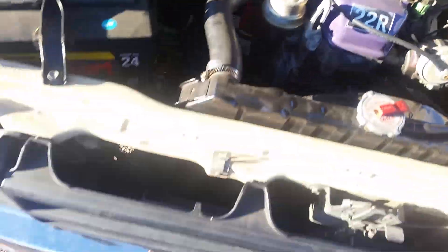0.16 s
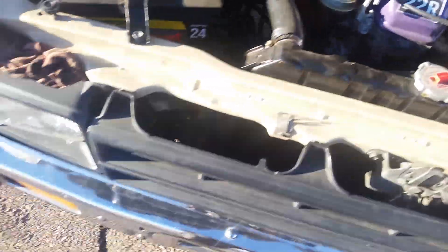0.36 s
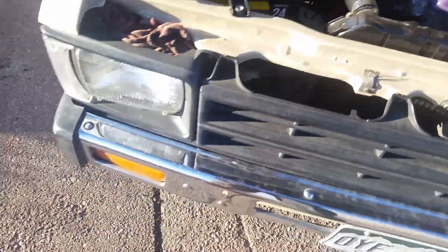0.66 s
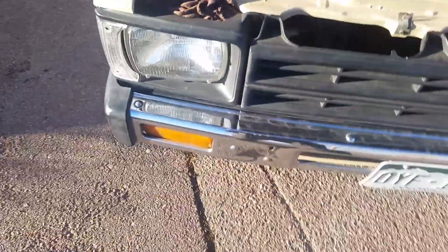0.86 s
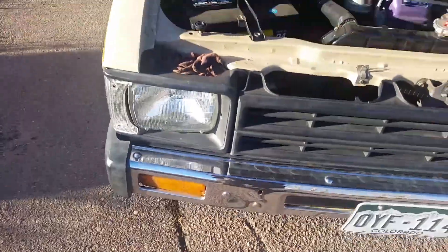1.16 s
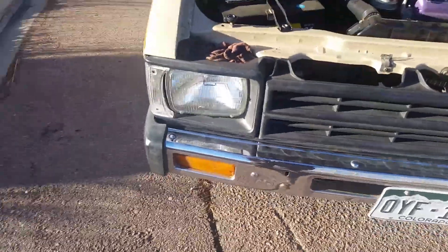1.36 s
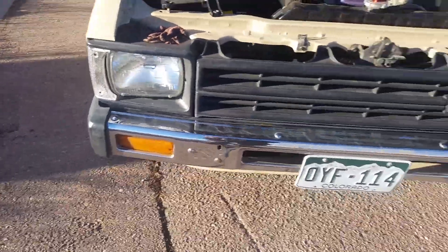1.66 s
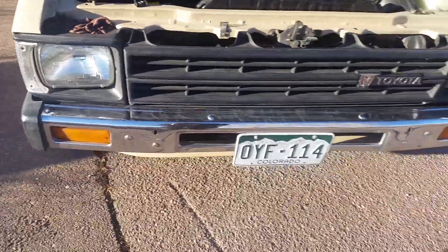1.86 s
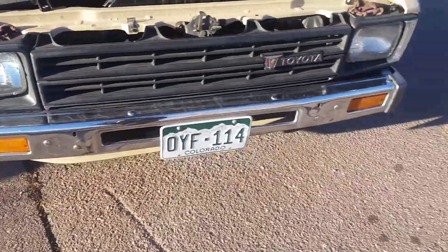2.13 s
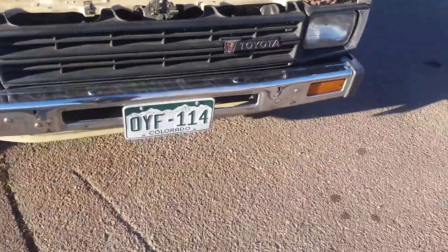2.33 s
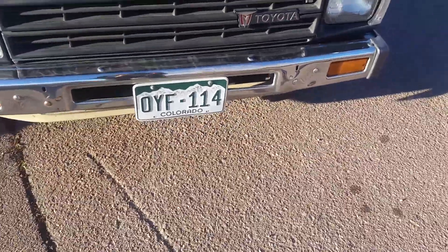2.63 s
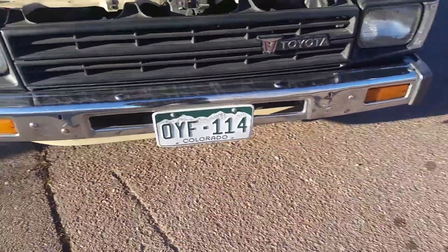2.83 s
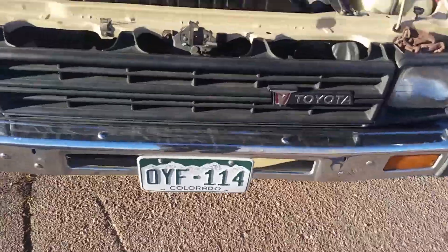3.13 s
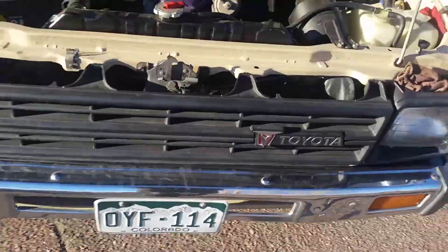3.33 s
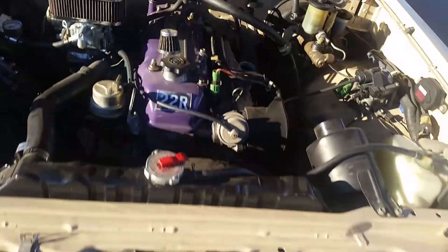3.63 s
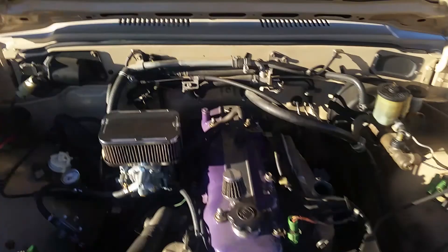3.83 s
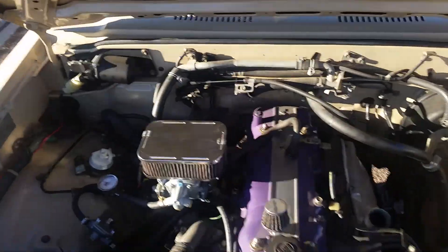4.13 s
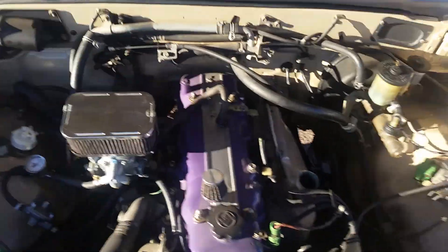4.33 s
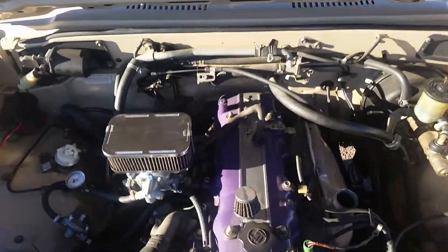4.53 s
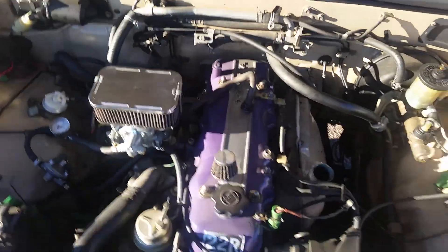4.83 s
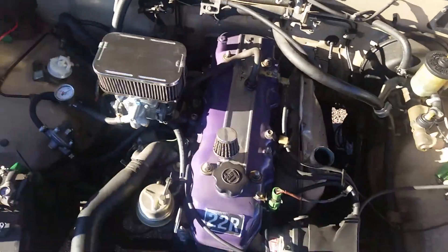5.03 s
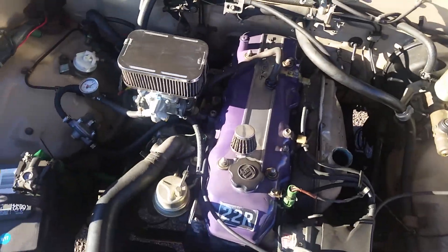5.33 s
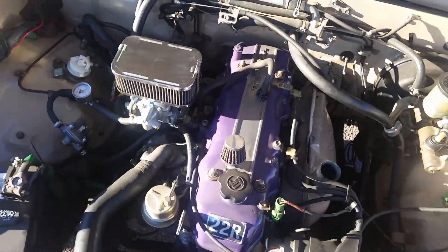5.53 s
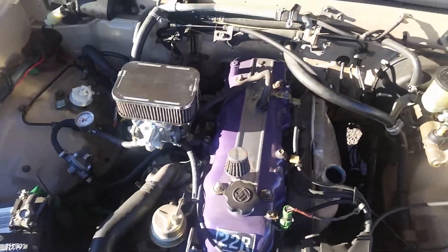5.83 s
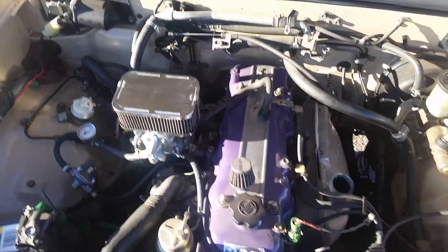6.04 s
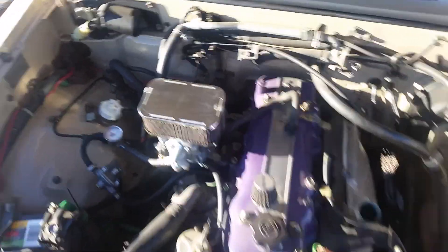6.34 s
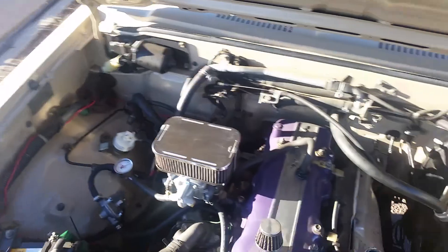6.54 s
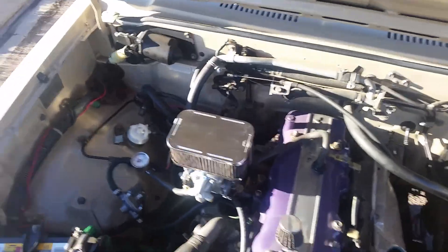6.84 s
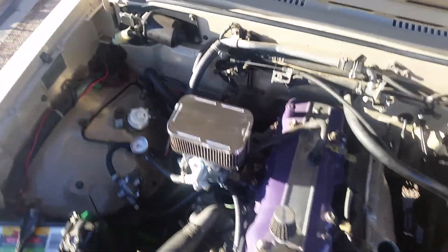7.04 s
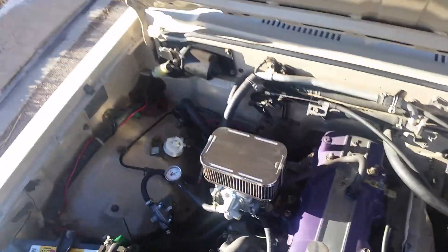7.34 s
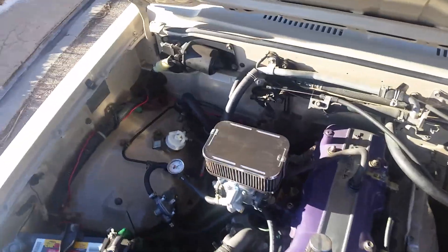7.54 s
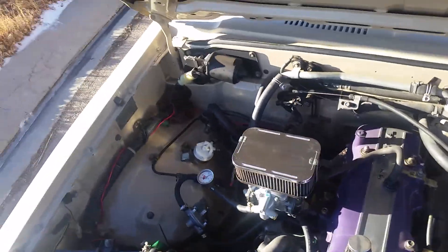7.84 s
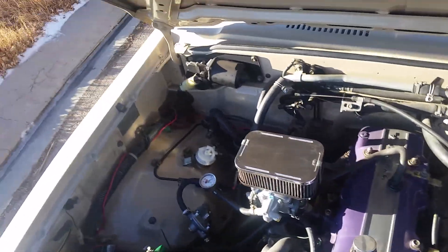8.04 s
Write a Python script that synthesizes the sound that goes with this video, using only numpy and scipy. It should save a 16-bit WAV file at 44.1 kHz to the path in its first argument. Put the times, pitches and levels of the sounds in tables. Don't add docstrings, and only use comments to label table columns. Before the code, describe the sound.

Steady low puttering idle with metallic clatter and airy hiss; one hard handling knock briefly dips the sound, then ticking stands out clearer.

```python
import sys
import numpy as np
from scipy import signal
from scipy.io import wavfile

SR = 44100
rng = np.random.default_rng(int(sys.argv[2]) if len(sys.argv) > 2 else 0)


def gain_from_db(level_db):
    decades = np.asarray(level_db, float) / 20
    return 10 ** decades


def wrap_up_sound(samples):
    columns = np.atleast_2d(samples).T
    tamed = np.clip(columns, -1, 1)
    steps = np.round(tamed * 32767).astype(np.int16)
    wavfile.write(sys.argv[1], SR, steps)


N = 361173

# frequency in Hz, t60 in seconds, level in dB.
CASTING_MODES = [(621, 0.049, 0.5), (765.6, 0.059, -1.5), (1635, 0.0054, -9.5), (1993, 0.011, -8),
                 (3110, 0.013, -25.5), (4145, 0.025, -25), (6380, 0.022, -13), (7090, 0.11, -15)]
# time in seconds, nearness in dB, view into the bay in dB,
# cover of the left port in dB.
MIC_WALK = [(0.0, -2, -7, -1), (0.13, -8.5, -1, 8), (0.27, -7.5, -0.5, 2), (0.43, -3.5, 1.5, 1.5),
            (0.55, -2.5, 3.5, 3), (0.8, -6, -3.5, 2.5), (1.05, -2.5, 0, 3.5), (1.25, -3.5, -1.5, 5.5),
            (1.6, -3, -2.5, 0.5), (1.75, -2.5, -2, -0.5), (1.92, -3.5, -1, 13), (2.3, -4.5, -4, 23),
            (2.62, -4, -4.5, 33), (2.76, -4, -2, 4), (2.93, -2.5, -1, 1.5), (4.6, -1, 0, 4),
            (6.6, 0, 1.5, 2.5), (8.19, -1, 2, 2)]


def in_time(rows):
    s, *columns = np.transpose(rows)
    return [np.interp(np.arange(N) / SR, s, column) for column in columns]


def at_hz(points, hz):
    table_hz, value = np.array(points).T
    return np.interp(np.log(hz), np.log(table_hz), value)


def rms_one(x):
    return x / np.sqrt(np.mean(x ** 2) + 1e-20)


def pan(db):
    return gain_from_db(np.multiply.outer([.5, -.5], db))


def drift(rate_hz):
    r = np.exp(-80 * np.pi * rate_hz / SR)
    white = rng.standard_normal(N // 40 + 2002)
    slow = signal.lfilter([1], [1, -2 * r, r * r], white)[2000:]
    return np.interp(np.arange(N) / 40, np.arange(len(slow)), rms_one(slow))


def ring(x, hz, t60_s):
    r = gain_from_db(-60 / (t60_s * SR))
    w = 2 * np.pi * hz / SR
    return signal.lfilter([0, np.sin(w)], [1, -2 * r * np.cos(w), r * r], x + 1e-18)


def band(x, low_hz, high_hz, order=2):
    return signal.sosfilt(signal.butter(order, [low_hz, high_hz], "band", fs=SR, output="sos"), x)


def bands(spectrum, edges_hz, patchy_db, rate_hz):
    # frequency in Hz, likeness as a share.
    likeness = [(60, 0.6), (130, 0.22), (290, 0.26), (640, 1), (1410, 0.08), (3100, 0.0054), (6820, 0.01),
                (15000, 0.01)]
    white = rng.standard_normal((2, 2, N))
    for k, (low_hz, high_hz) in enumerate(zip(edges_hz, edges_hz[1:])):
        mid, side = band(white[k % 2], low_hz, high_hz)
        hz = np.sqrt(low_hz * high_hz)
        alike = np.clip(at_hz(likeness, hz), 0, 1)
        gain = gain_from_db(at_hz(spectrum, hz) + patchy_db * drift(rate_hz))
        yield hz, gain * (np.sqrt(1 + alike) * mid + np.sqrt(1 - alike) * side * [[1], [-1]])


def over_bay():
    rise_s = (3.2, 4.2)
    return np.interp(np.arange(N) / SR, rise_s, [0, 1])


def duck(lead_s=0.0, slower=0.64):
    at_s, attack_s, hold_to_s, release_s = 3.01, 0.24, 3.825, 0.61
    t = np.arange(N) / SR
    fall = 1 - np.exp(-np.clip(t - at_s, 0, None) / (attack_s * slower))
    recovery = np.clip(1 - (t + lead_s - hold_to_s) / (release_s + lead_s), 0, 1)
    return fall * recovery


def heard_db(law, lead_s=0.0, slower=0.62):
    db, near_share, view_share, grille_db, duck_db = law
    near_db, view_db, _ = in_time(MIC_WALK)
    place_db = near_share * near_db + view_share * view_db + grille_db * (1 - over_bay())
    return db + place_db - duck_db * duck(lead_s, slower)


def exhaust(firings, boom_db, bark_db, rattle_db):
    cylinder_db = [-0.49, -0.3, -0.15, 0.47]
    # frequency in Hz, t60 in seconds, level in dB.
    pipe_modes = [(68.9, 0.2, -3), (85, 0.3, -15), (143.6, 0.19, -11)]
    # low edge in Hz, high edge in Hz, extra path in seconds.
    silencer = (152, 198, .0048)
    low_hz, high_hz, path_s = silencer

    count = np.floor(firings - .297).astype(int)
    uneven_db = 0.1 * rng.standard_normal(count.max() + 2)[count]
    strength_db = np.array(cylinder_db)[count % 4] + uneven_db
    pulses = np.diff(count, prepend=count[0]) * gain_from_db(strength_db)
    pipe = sum(gain_from_db(db) * ring(pulses, hz, t60_s) for hz, t60_s, db in pipe_modes)
    boom = gain_from_db(boom_db) * rms_one(band(pipe, 49.4, 129.7)) * pan(-1.35)[:, None]

    late = np.roll(pulses, round(path_s * SR))
    bark = gain_from_db(bark_db - 1.5) * rms_one(band(late, low_hz, high_hz, order=3))
    block_db = rattle_db - 3.5 - 15.0 * (1 - over_bay())
    knock = gain_from_db(block_db) * rms_one(band(late, 248, 328))
    rumble = gain_from_db(boom_db - 14.0) * rms_one(band(rng.standard_normal(N), 26, 181))
    return boom + bark + knock + rumble


def valve_gear(firings, rattle_db, sizzle_db):
    # frequency in Hz, density in dB per Hz.
    rattle_spectrum = [(120, -30), (200, -15), (234, -13), (341, -15.5), (489, -21), (902, -17.5),
                       (1070, -21), (1800, -26), (2010, -19.5), (2310, -27), (4200, -29.5), (4680, -33.5),
                       (5310, -27), (6020, -32.5), (8500, -31), (11000, -62), (18700, -120)]
    # frequency in Hz, left-right difference in dB.
    lean_by_hz = [(60, -1.0), (110, 0.0), (200, 10), (380, -0.5), (700, 4.5), (1290, 9), (2380, 4.5),
                  (4400, -2.0), (8120, 7.5), (15000, -5.0)]

    noise = 0
    for hz, x in bands(rattle_spectrum, np.geomspace(200, 8500, 17), patchy_db=2.5, rate_hz=29.6):
        treble = np.clip(np.log2(hz / 1800), 0, 1)
        level_db = (1 - treble) * rattle_db + treble * (sizzle_db + 9.5)
        noise = noise + gain_from_db(level_db + 27.5) * x * pan(at_hz(lean_by_hz, hz))[:, None]

    ticks_per_s = 300 * gain_from_db(5.0 * np.cos(2 * np.pi * (firings - .15)))
    sizes = gain_from_db(4.85 * np.minimum(rng.exponential(1, (2, N)), 4)) * rng.choice([-1, 1], (2, N))
    ticks = (rng.random((2, N)) < ticks_per_s / SR) * sizes
    ticks = ticks + 0.37 * ticks[::-1]
    rung = 0
    for hz, t60_s, db in CASTING_MODES:
        level_db = rattle_db if hz < 2500 else sizzle_db + 11.0
        rung = rung + gain_from_db(db + level_db) * rms_one(ring(ticks, hz, t60_s))
    return noise + gain_from_db(-7.5) * rung


def intake(firings):
    # frequency in Hz, density in dB per Hz.
    hiss_spectrum = [(4410, -40), (7500, -10), (7690, -5), (9000, 12), (9770, 7.5), (10900, 14.5),
                     (12600, -1), (13700, -2), (15100, 10), (15900, -9)]
    puff_db = [12.0, 4.0, -2.0, 3.0]
    puff_hz = [10900, 9000, 10500, 10500]
    # level in dB, share of nearness, share of view,
    # change at the grille in dB, duck depth in dB.
    low_law = (-44, 0.0, 0.8, -3, 24.5)
    high_law = (-36, 0.0, 1.0, -1.5, 27)

    lead_s = 0.12
    cover_db = in_time(MIC_WALK)[2]
    low_db = heard_db(low_law, lead_s) - 0.3 * cover_db
    high_db = heard_db(high_law, lead_s) - 0.17 * cover_db
    low_pan_db = 12 - cover_db
    high_pan_db = -7 - 0.73 * cover_db

    count, share = np.divmod(firings - .24, 1)
    count = count.astype(int)
    size_luck, pitch_luck = rng.standard_normal((count.max() + 2, 2))[count].T
    size = gain_from_db(np.array(puff_db)[count % 4] + 2.5 * size_luck - 3 * (1 - over_bay()))
    puff = size * np.sin(np.pi * np.clip(share / .7, 0, 1)) ** 2
    throat_hz = np.array(puff_hz)[count % 4] * (1 + .04 * pitch_luck) * (1.06 - .17 * share)

    low, high = 0, 0
    for hz, x in bands(hiss_spectrum, np.geomspace(7500, 16000, 11), patchy_db=1.7, rate_hz=14):
        if hz < 12000:
            reach = np.exp(-np.log2(hz / throat_hz) ** 2 / .03)
            low = low + x * np.hypot(1, puff * reach)
        else:
            high = high + x
    low = gain_from_db(low_db + 4.5) * pan(low_pan_db) * rms_one(low)
    high = gain_from_db(high_db - 4.0) * pan(high_pan_db) * rms_one(high) * np.hypot(1, .2 * puff)
    flutter = gain_from_db(1.4 * drift(20) + 0.8 * np.array([drift(12), drift(12)]))
    return flutter * (low + high)


def whistle():
    # level in dB, share of nearness, share of view,
    # change at the grille in dB, duck depth in dB.
    whistle_law = (-50.5, 0.0, 0.6, -0.5, 19.5)
    air = ring(ring(rng.standard_normal((2, N)), 5340, 0.009), 5450, 0.009)
    level_db = heard_db(whistle_law) + 2.0 * drift(0.69) + 0.5 * drift(10)
    return gain_from_db(level_db) * rms_one(air) * pan(-3.0)[:, None]


def microphone_noise():
    return gain_from_db(-72) * rms_one(band(rng.standard_normal((2, N)), 2500, 8500))


def gusts_db(gusts, breeze_db):
    breeze_duck_db, fall_db = 14, 11.5
    t = np.arange(N) / SR
    humps = [db - fall_db * ((t - s) / half_s) ** 2 for s, db, half_s in gusts]
    return np.max(humps + [breeze_db - breeze_duck_db * duck()], axis=0)


def wind():
    # frequency in Hz, density in dB per Hz.
    wind_spectrum = [(24, -41), (45, -4), (115, 8), (241, -14.5), (271, -11), (326, -26.5), (556, -32.5),
                     (658, -34), (900, -39), (1170, -66), (1980, -120)]
    # peak in seconds, level in dB, half length in seconds.
    left_gusts = [(.17, -10.5, 0.12), (.25, -7.5, 0.12), (.33, -10.5, 0.062), (.66, -13, 0.09),
                  (.775, -8.5, 0.078), (.98, -21, 0.17), (1.12, -17, .07), (1.42, -18, 0.061),
                  (1.71, -20.5, 0.06), (2.65, -25, 0.067), (2.8, -25, 0.13), (3.85, -33.5, 0.072),
                  (4.25, -24, 0.26), (5.69, -21, 0.036), (5.86, -13, 0.041), (6.03, -19, 0.19),
                  (6.2, -17, 0.12), (6.37, -17, 0.038), (6.53, -19.5, 0.1), (6.92, -21.5, 0.24),
                  (7.12, -18, .09), (7.3, -18.5, 0.1), (7.76, -27, 0.13)]
    # peak in seconds, level in dB, half length in seconds.
    right_gusts = [(.54, -27, 0.3), (1.21, -21.5, 0.077), (2.06, -23.5, 0.057), (2.89, -31, .1),
                   (3.41, -37.5, .1), (4.34, -30, 0.029), (5.77, -30, .06), (6.45, -25.5, .07),
                   (6.62, -23.5, 0.076), (7.46, -32, 0.086), (8.14, -30, 0.14)]

    hump_db = np.array([gusts_db(left_gusts, breeze_db=-35), gusts_db(right_gusts, breeze_db=-44)])
    level_db = hump_db + 3.96 * np.array([drift(15.8), drift(23)])
    strong_db = np.clip(level_db + 12.0, -10, 20)
    gust = 0
    for hz, x in bands(wind_spectrum, np.geomspace(42, 900, 10), patchy_db=-2.0, rate_hz=14.0):
        gust = gust + x * gain_from_db(0.44 * strong_db * np.clip(np.log2(hz / 150), 0, 1.5))
    return gain_from_db(level_db + 15.0) * gust


def scuffs(rows, below, above, channels):
    out = np.zeros((channels, N))
    for s, length_s, hz, db in rows:
        swell = np.sin(np.pi * np.linspace(0, 1, round(length_s * SR)) ** 0.5) ** 2
        noise = rng.standard_normal((channels, SR // 3))[:, :len(swell)]
        start = round(s * SR)
        scuff = swell * gain_from_db(db) * rms_one(band(noise, hz / below, hz * above))
        out[:, start:start + len(swell)] += scuff
    return out


def handling():
    # time in seconds, # body
    # level in dB, body frequency in Hz, t60 in seconds, snap level in dB.
    knocks = [(.150, -16, 350, 0.01, -45), (.206, -10.5, 302, 0.014, -50), (.612, -21, 440, 0.015, -37),
              (0.256, -22, 507, 0.025, -55), (0.783, -16, 434, 0.025, -47), (1.4677, -5, 400, 0.0036, -20),
              (2.485, -33, 420, .016, -29.5), (2.7858, -11, 456, 0.01, -14.5), (3.0724, 2.5, 520, .012, -3),
              (3.0926, -8.5, 440, 0.0085, -31), (3.321, -40, 420, .02, -58), (3.436, -27, 487, 0.0059, -46),
              (3.552, -22, 390, 0.012, -57), (3.658, -28, 399, 0.012, -61), (6.533, -21, 627, 0.017, -30),
              (7.8163, -16.5, 361, 0.15, -34), (7.84, -20, 460, 0.027, -26)]
    # start in seconds, length in seconds, frequency in Hz, level in dB.
    palm_rubs = [(.84, 0.32, 1140, -43), (1.10, .033, 300, -34), (1.30, 0.03, 1390, -37),
                 (1.695, 0.042, 336, -24), (2.74, 0.15, 690, -39.5), (2.875, 0.066, 482.4, -28.5),
                 (2.92, 0.031, 533, -29), (3.003, 0.034, 940, -33.5), (3.38, .066, 460, -46),
                 (6.51, 0.079, 239, -20.5), (7.806, 0.039, 4900, -34), (7.812, 0.042, 486, -25)]
    # start in seconds, length in seconds, frequency in Hz,
    # level in dB.
    tip_scratches = [(.84, 0.3, 2680, -39), (.45, .25, 1490, -56), (1.30, 0.047, 1660, -34.5),
                     (1.34, 0.11, 1400, -38), (1.69, 0.058, 1630, -32), (2.74, 0.094, 2960, -38),
                     (2.92, .034, 980, -42), (3.003, 0.048, 4480, -35), (3.10, 0.19, 2780, -49.5),
                     (3.365, 0.051, 2400, -55), (3.395, 0.04, 2940, -46.5), (6.51, 0.1, 537, -21.5),
                     (7.806, 0.035, 12000, -23), (7.812, 0.04, 1300, -29)]
    grip_ends_db = (16, -1.5)

    out = np.zeros((2, N))
    impulse = signal.unit_impulse(2400)
    crack = band(impulse, 4000, 15000)
    click = band(impulse, 60, 4600, order=3)
    snap = ring(click, 1300, 0.0039) - 0.66 * ring(click, 2400, 0.0065)
    snap = snap + 0.88 * ring(click, 3640, 0.003) + 0.68 * ring(click, 7300, 0.001) + 0.16 * crack
    grip_db = np.interp(over_bay(), [0, 1], grip_ends_db)
    for s, db, hz, t60_s, snap_db in knocks:
        start = round(s * SR)
        body = ring(click, hz, t60_s) + 0.16 * ring(click, 0.533 * hz, 4.9 * t60_s)
        knock = gain_from_db(db) * body + gain_from_db(snap_db) * snap
        out[:, start:start + len(click)] += np.outer(pan(grip_db[start]), knock)
    rubs = scuffs(palm_rubs, below=1.25, above=1.01, channels=1) * pan(6.2)[:, None]
    scratches = scuffs(tip_scratches, below=2.14, above=1.42, channels=2)
    return out + rubs + scratches


def tappet():
    # time in seconds, peak level in dB.
    loud_taps = [(4.4974, -35), (4.5468, -28), (4.753, -24), (5.089, -22), (5.4062, -19.5), (5.4627, -34),
                 (5.6, -26), (5.757, -32), (6.016, -27), (6.228, -38), (6.361, -22), (6.443, -20),
                 (6.4744, -20), (6.658, -27.5), (6.7605, -24), (7.071, -39), (7.1074, -29), (7.153, -32),
                 (7.363, -27), (7.6472, -25), (7.71, -33)]
    at_s, peak_db = np.transpose(loud_taps)
    light_per_s, light_db = 30, -30

    out = np.zeros(N)
    chance_db = 1.1 * rng.standard_normal((len(loud_taps), len(CASTING_MODES)))
    light = rng.random(N) < light_per_s * gain_from_db(6 * drift(2)) / SR
    light = light * gain_from_db(light_db - 32 * duck()) * over_bay()
    for k, (hz, t60_s, db) in enumerate(CASTING_MODES[2:6]):
        clicks = light * gain_from_db(db + 3.0 + 3.5 * rng.standard_normal(N))
        clicks[(at_s * SR).astype(int)] = gain_from_db(peak_db + db + 5.5 + chance_db[:, k])
        out += band(ring(clicks, hz, 2.2 * t60_s), hz / 1.14, hz * 1.13, order=1)
    return out * pan(5.5)[:, None]


def scene():
    # time in seconds, firings per second.
    crank_speed = [(0.0, 23.4), (0.5, 23.41), (0.8, 23.02), (1.4, 23.7), (1.7, 22.91), (2.3, 23.72),
                   (2.6, 23.43), (2.9, 24.08), (3.5, 23.27), (4.4, 24.02), (6.2, 23.45), (6.5, 24.02),
                   (6.8, 23.65), (7.1, 23.79), (7.7, 23.44), (8.19, 23.44)]
    # level in dB, share of nearness, share of view,
    # change at the grille in dB, duck depth in dB.
    boom_law = (-17, 1.0, 0.0, -0.5, 18)
    bark_law = (-29.5, 0.8, 0.0, 7.5, 17.5)
    rattle_law = (-37, 0.66, 0.5, 1, 19.5)
    sizzle_law = (-48.5, 0.5, 0.42, -1.5, 40)

    firings = np.cumsum(in_time(crank_speed)[0]) / SR + 4
    boom_db, bark_db, rattle_db = map(heard_db, [boom_law, bark_law, rattle_law])
    sizzle_db = heard_db(sizzle_law, slower=1.2)
    engine = exhaust(firings, boom_db, bark_db, rattle_db) + valve_gear(firings, rattle_db, sizzle_db)
    air = intake(firings) + whistle() + wind()
    return engine + air + microphone_noise() + handling() + tappet()


def low_pass(x):
    return signal.sosfilt(signal.butter(12, 16710, fs=SR, output="sos"), x)


def record(dry):
    clipped = dry / (1 + np.abs(dry / .9) ** 6) ** (1 / 6)
    top_cut = signal.cheby2(12, 36, 16100, fs=SR, output="sos")
    mix = signal.sosfilt(top_cut, clipped)
    return low_pass(mix)


dry = scene()
out = record(dry)
wrap_up_sound(out)
```